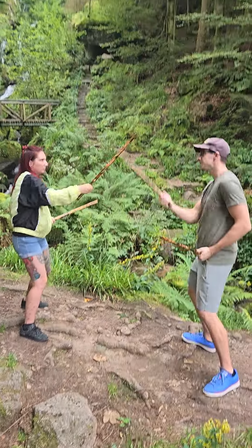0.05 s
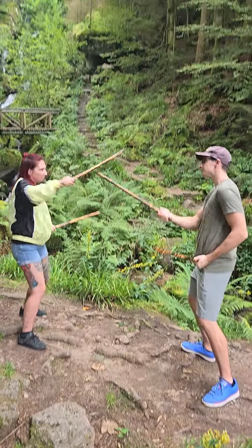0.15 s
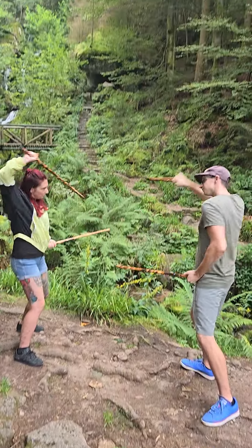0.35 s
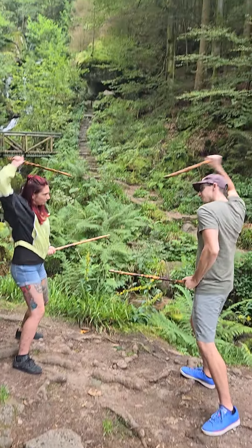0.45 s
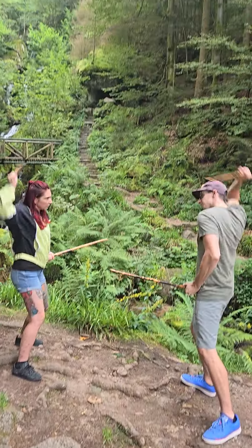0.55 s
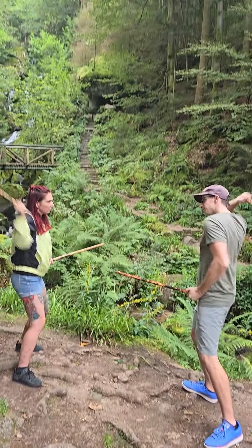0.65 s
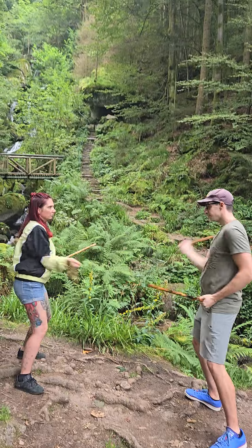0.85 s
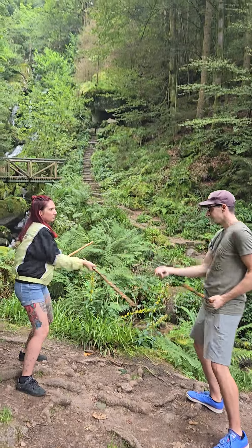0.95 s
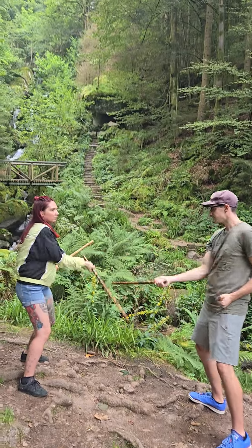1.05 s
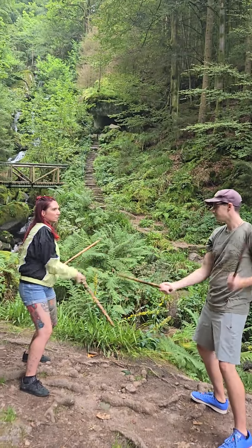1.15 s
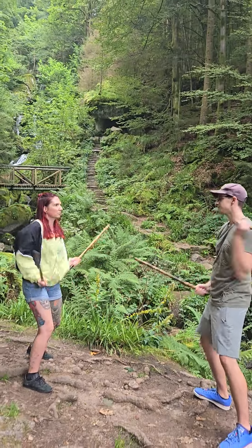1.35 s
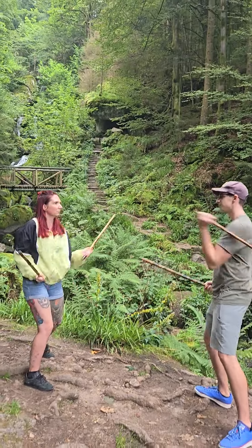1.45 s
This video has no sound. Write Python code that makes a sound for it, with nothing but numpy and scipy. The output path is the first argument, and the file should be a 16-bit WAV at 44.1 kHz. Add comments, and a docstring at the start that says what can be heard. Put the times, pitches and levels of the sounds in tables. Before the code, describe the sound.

Wooden sticks clack together in a forest clearing over quiet, steady rushing water. At about 0.24 seconds comes a hard, bright, slightly clipped crack with a very short woody ring, reflections off the ground and a faint echo from trees. Soft low handling bumps, mostly on the right, come around 0.73 to 0.92 seconds. At 1.2 seconds a second, slightly quieter clack chatters briefly and fades into the trees.

```python
"""Stick sparring by a stream

Two people spar with wooden sticks on a forest path, beside a rushing stream made of shaped noise.
The sticks clack twice: a hard crack and a short ring of decaying sines,
scattered by the ground and returned by the trees.
Between the blows a few soft bumps, short low pushes, reach the hand-held microphone."""
import sys
import numpy as np
from scipy import signal
from scipy.fft import rfft, irfft
from scipy.io import wavfile
from scipy.ndimage import uniform_filter1d

SR = 44100
rng = np.random.default_rng(int(sys.argv[2]) if len(sys.argv) > 2 else 0)


def output_pcm(signal):
    """Save a mono or channel-first signal as 16-bit PCM at the path in sys.argv[1].

    Samples are clipped to [-1, 1] before scaling.
    """
    pcm = np.clip(np.atleast_2d(signal).T, -1, 1) * 32767
    wavfile.write(sys.argv[1], SR, np.round(pcm).astype(np.int16))


N = 66150  # samples, 1.5 s


def amp(db):
    """Decibels to gain."""
    return 10 ** (np.asarray(db) / 20)


def unit(x):
    """Scales to an rms of 1."""
    return x / np.sqrt(np.mean(x ** 2) + 1e-20)


def decay(t, t60):
    """Exponential decay that falls by 60 dB in t60 seconds."""
    return np.exp(-np.log(1000) * t / t60)


def read(points, hz):
    """Reads a table on a log-frequency axis."""
    f, value = np.transpose(points)
    return np.interp(np.log(hz + 1), np.log(f + 1), value)


def add(mix, start_s, sound):
    """Mixes a sound in at a time, cut off at the end of the mix."""
    part = mix[max(round(start_s * SR), 0):][:len(sound)]
    part += sound[:len(part)]


def click(spectrum, size=8192):
    """The shortest causal pulse that has this spectrum (minimum phase)."""
    hz = abs(np.fft.fftfreq(size, 1 / SR))
    log_gain = np.log(amp(read(spectrum, hz)))
    pulse = np.fft.ifft(np.exp(np.conj(signal.hilbert(log_gain)))).real
    return pulse[:size // 2]


# Spectrum of the rushing water. Each row: frequency in Hz, relative level in dB per Hz.
WATER = [(20, -21), (45, -5), (75, 0), (110, -2), (200, 1), (420, -1.5), (720, -2), (1050, -6), (2000, -8),
         (4500, -12), (8000, -12), (16000, -13)]
# How alike the water is on both sides. Each row: frequency in Hz, likeness from 0 to 1.
LIKENESS = [(30, 0.49), (120, 1), (300, 0.89), (700, 0.89), (1400, 0.42), (2500, 0.039), (16000, 0.031)]
# Slow drift of the water. Each row: time in seconds, level change in dB.
WATER_DRIFT = [(0, 0.5), (.35, 0.7), (.7, -0.15), (1, -0.24), (1.5, -0.2)]
WATER_DB, PATCHY_DB, SWELL_DB = -40.5, 0.6, 0.36  # rms before the drift; rms depth of patches and swell


def stream(size=1024):
    """Rushing water: wide noise with faint drifting patches and a slight swell, partly shared by both sides."""
    hop, hz = size // 4, np.fft.rfftfreq(size, 1 / SR)
    frames = N // hop + 5
    a, b, c, d, patches = rng.standard_normal((frames, len(hz), 5)).T
    # smooth the patches over 12 frequency bins, then over 10 frames
    patches = uniform_filter1d(patches, size=12, axis=0)
    patches = unit(uniform_filter1d(patches, size=10, axis=1))
    swell = unit(uniform_filter1d(rng.standard_normal(frames), size=40))
    left, other = a + 1j * b, c + 1j * d
    same = read(LIKENESS, hz)[:, None]
    right = same * left + np.sqrt(1 - same ** 2) * other
    level_db = read(WATER, hz)[:, None] + PATCHY_DB * patches + SWELL_DB * swell
    bins = np.array([left, right]) * amp(level_db)
    water = signal.istft(bins, nperseg=size, noverlap=size - hop)[1][:, :N]
    drift_db = np.interp(np.arange(N) / SR, *np.transpose(WATER_DRIFT))
    return amp(WATER_DB + drift_db) * unit(water)


def travel(pulse, travel_ms):
    """Bending waves run along the stick at a speed that grows with the root of frequency: treble arrives first."""
    hz, at_khz_s = np.fft.rfftfreq(len(pulse), 1 / SR), travel_ms / 1000
    # the second term takes off the arrival time of the highest frequency
    turns = at_khz_s * (2 * np.sqrt(1000 * hz) - hz * np.sqrt(1000 / hz[-1]))
    return irfft(rfft(pulse) * np.exp(-2j * np.pi * turns), len(pulse))


# Ringing modes of the wood in the high and in the low blow.
# Each row: frequency in Hz, level in dB before the level of the blow, time to fall 60 dB in seconds.
HIGH_MODES = [(1516, -39.5, 0.1), (2092, -26, 0.076), (2185, -29.5, 0.016), (2380, -29, .045),
              (2520, -51, .07), (2740, -34, 0.072), (3220, -22.5, 0.058), (3620, -20, 0.019),
              (3946, -19, .035), (4370, -35, 0.052), (5340, -56, 0.045), (7600, -45, 0.036)]
LOW_MODES = [(617, -44, 0.032), (910, -36, 0.048), (910, -54, 0.041), (1410, -36.5, 0.096),
             (1563, -33, 0.075), (2297, -33, 0.1), (3401, -21, 0.045), (3530, -23, 0.03), (3690, -28, .05),
             (4150, -33, 0.05), (4860, -40, 0.031), (5560, -28, 0.039), (5720, -30, 0.043),
             (7310, -42, 0.15)]
# Spectrum of the crack where the sticks touch. Each row: frequency in Hz, relative level in dB.
HIGH_CRACK = [(150, -22), (1200, -11), (1700, 9.5), (2100, 18.5), (2900, 12.5), (4200, 19.5), (4900, 18.5),
              (5700, 14.5), (6300, 11.5), (8500, 5.5), (11000, 7.5), (16000, -2)]
LOW_CRACK = [(150, -35), (1100, -7), (1450, 6), (1900, 9.5), (2800, 2), (3450, 22.5), (4100, 13),
             (5700, 15.5), (6700, -2.5), (8500, 2.5), (11000, -5), (16000, -31)]
REBOUND = 0.57  # each gap between touches as a share of the one before


def clack(crack, modes, travel_ms, chatter_ms, chatter_db, count=3):
    """A crack and the ring of the wood; the sticks chatter, each touch sooner and weaker than the last."""
    t = np.arange(SR // 4) / SR
    wood = np.zeros(len(t))
    for hz, db, t60 in modes:
        wood += amp(db) * decay(t, t60) * np.sin(2 * np.pi * hz * t)
    contact, touch_s = click(crack), 0
    for k in range(count):
        add(wood, touch_s, amp(k * chatter_db) * contact)
        touch_s += chatter_ms / 1000 * REBOUND ** k
    return travel(wood, travel_ms)


def tail(t60, rise_s):
    """Many small reflections of random sign that swell and die away; energy 1 on each side."""
    t = np.arange(SR) / SR
    taps = rng.choice([-1., 1.], (2, SR)) * (rng.random((2, SR)) < 1 / 20)
    taps = taps * (1 - np.exp(-t / rise_s)) * decay(t, t60)
    return taps / np.linalg.norm(taps, axis=1, keepdims=True)


# Near reflections of each blow, off the ground and the fighters.
# Each row: delay in ms, left level in dB, right level in dB.
HIGH_BOUNCES = [(3.2, -30, -33), (5.3, -34, -28), (10.2, -31, -31), (12.0, -37, -33), (17.5, -17, -25)]
LOW_BOUNCES = [(3.3, -3, -2), (7.5, -29, -19), (18.0, -17, -19)]
# The right port of the microphone faces away from the sticks: colour of the direct sound there.
# Each row: frequency in Hz, gain in dB.
HIGH_SHADE = [(200, -21), (1400, -10), (2200, 7), (3500, -16), (5200, 0.5), (7000, -2), (11000, -4)]
LOW_SHADE = [(200, -13), (2200, 5.5), (3500, 0), (5200, -25), (7000, 1), (11000, -26)]
SCATTER_T60_S, SCATTER_RISE_S = 0.093, 0.0022
FOREST_T60_S, FOREST_RISE_S = 0.7, 0.0056
ECHO_S, ECHO_T60_S, ECHO_RISE_S = 0.0735, 0.26, 0.0016  # a stand of trunks throws the clack back


def clearing(bounces, shade, scatter_db, forest_db, echo_db):
    """Direct path, near bounces, scatter from ground and ferns, and the long answer of the trees."""
    scatter = amp(scatter_db) * tail(SCATTER_T60_S, SCATTER_RISE_S)
    forest = amp(forest_db) * tail(FOREST_T60_S, FOREST_RISE_S)
    paths = scatter + forest
    paths[0, 0] += 1  # direct sound on the left
    add(paths[1], 0, click(shade))  # direct sound on the right
    for ms, left_db, right_db in bounces:
        paths[:, round(ms * SR / 1000)] += amp([left_db, right_db])
    for side, echo in zip(paths, tail(ECHO_T60_S, ECHO_RISE_S)):
        echo[0] += 0.7  # a sharp front to the echo
        add(side, ECHO_S, amp(echo_db) * echo)
    return paths


# The two blows on the path. Each row: start in seconds, level in dB, left over right in dB,
# lag of the right side in ms, bending wave travel in ms at 1 kHz (less that of the highest frequency),
# first chatter gap in ms, chatter step in dB per touch, scatter in dB, forest in dB, echo in dB,
# then the crack, modes, bounces and shade tables.
BLOWS = [(0.2377, 2, 0.5, 0.22, 1.987, .35, -13.5, -6.5, -11.5, -20.5, HIGH_CRACK, HIGH_MODES, HIGH_BOUNCES, HIGH_SHADE),
         (1.1959, -1, -1, 0.27, 1.072, 1.2, -9.5, -5.5, -8.5, -39, LOW_CRACK, LOW_MODES, LOW_BOUNCES, LOW_SHADE)]


def sticks():
    """Each blow sounds through the clearing to both sides of the microphone."""
    out = np.zeros((2, N))
    for (start_s, db, pan_db, lag_ms, travel_ms, chatter_ms, chatter_db,
         scatter_db, forest_db, echo_db, crack, modes, bounces, shade) in BLOWS:
        wood = clack(crack, modes, travel_ms, chatter_ms, chatter_db)
        paths = clearing(bounces, shade, scatter_db, forest_db, echo_db)
        left, right = signal.fftconvolve(wood[None], paths, axes=1)
        add(out[0], start_s, amp(db + pan_db / 2) * left)
        add(out[1], start_s + lag_ms / 1000, amp(db - pan_db / 2) * right)
    return out


# Bumps on the body of the hand-held microphone. Each row: start in seconds, level in dB.
BUMPS = [(.335, -34), (.7320, -25), (0.7629, -27.5), (.7810, -28.5), (0.9117, -31.5)]
BUMP_HZ, BUMP_PEAK_S, BUMP_WIDTH_S, BUMP_LEFT_DB = 106.5, 0.00987, 0.005, -16
KNOCK_HZ, KNOCK_DB, KNOCK_S = 260, -4.5, 0.00264  # KNOCK_S is both its lead on the push and its width


def bumps():
    """Handling gives short low pushes; the case knocks dully just ahead of each, mostly at the right port."""
    t = np.arange(SR // 20) / SR - BUMP_PEAK_S
    push = -np.sin(2 * np.pi * BUMP_HZ * t) * np.exp(-(t / BUMP_WIDTH_S) ** 2)
    early = t + KNOCK_S
    knock = amp(KNOCK_DB) * np.sin(2 * np.pi * KNOCK_HZ * early) * np.exp(-(early / KNOCK_S) ** 2)
    right = np.zeros(N)
    for start_s, db in BUMPS:
        add(right, start_s, amp(db) * (push + knock))
    return np.array([amp(BUMP_LEFT_DB) * right, right])


def scene():
    """Stream, sticks and handling together."""
    return stream() + sticks() + bumps()


# Colour of the two microphone ports. Each row: frequency in Hz, gain in dB.
LEFT_PORT = [(30, -8.5), (150, -2.5), (1000, -0.5), (1800, -2.5), (3000, 0.5), (4500, 0.5), (6000, 1),
             (6900, 6.5), (7330, 12), (7800, 4), (8600, -6), (10000, -17), (11500, -11), (13000, -2),
             (14500, -4), (15700, -39)]
RIGHT_PORT = [(30, 2), (150, -1.5), (1100, 1), (1500, 3.5), (2100, 5.5), (2600, 3.5), (3000, 1), (4400, -2),
              (5500, -1), (6500, -2), (7400, 1), (8500, -6), (10800, -14.5), (12300, -6.5), (13600, -9),
              (15700, -7)]
OVERLOAD, EDGE_HZ = 0.58, 15800  # clipping level before the low-pass; upper edge of the band


def record(dry):
    """Each port colours the sound, peaks past the overload level are clipped, and the band is limited."""
    ports = zip(dry, (LEFT_PORT, RIGHT_PORT))
    coloured = np.array([signal.fftconvolve(side, click(port))[:N] for side, port in ports])
    clipped = np.clip(coloured, -OVERLOAD, OVERLOAD)
    low_pass = signal.firwin(511, EDGE_HZ, window=("kaiser", 9), fs=SR)
    return signal.oaconvolve(clipped, low_pass[None], "same")


dry = scene()
out = record(dry)
output_pcm(out)
```